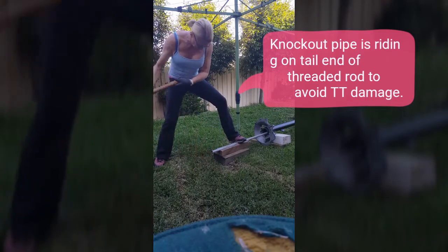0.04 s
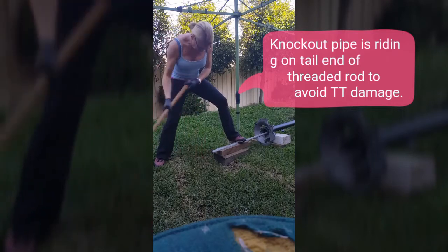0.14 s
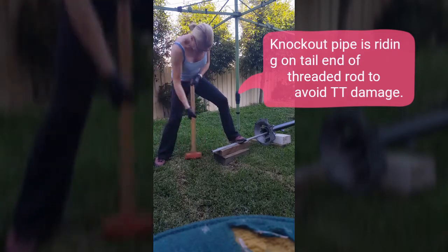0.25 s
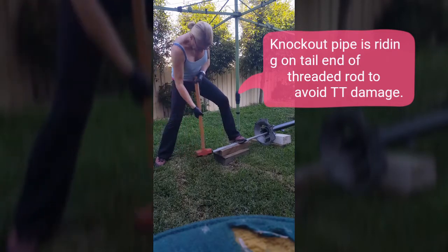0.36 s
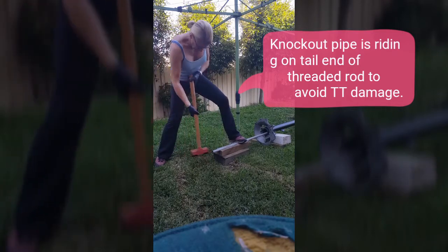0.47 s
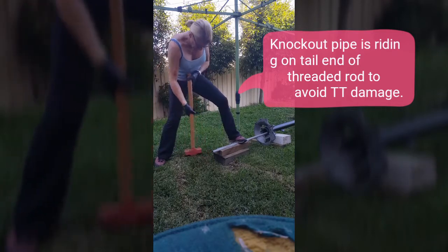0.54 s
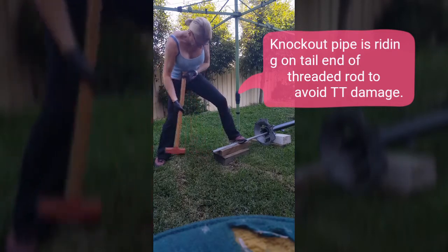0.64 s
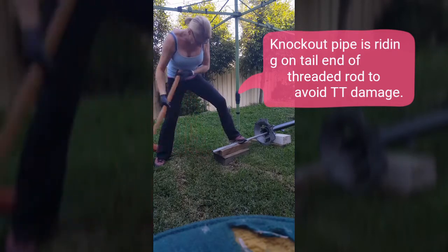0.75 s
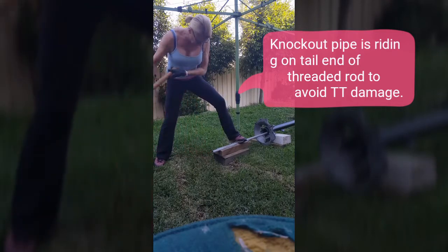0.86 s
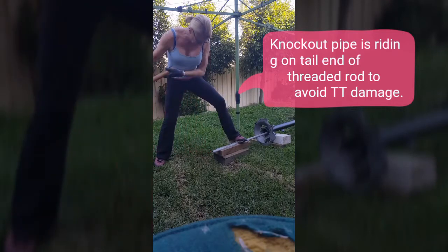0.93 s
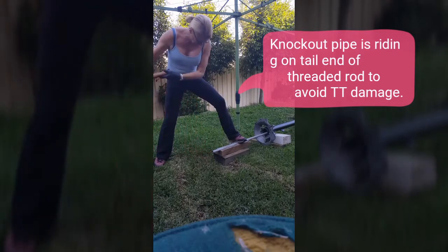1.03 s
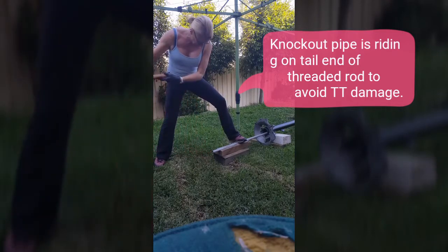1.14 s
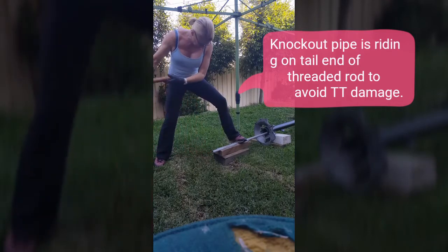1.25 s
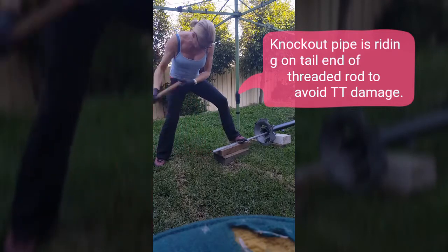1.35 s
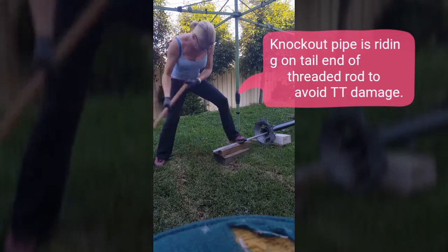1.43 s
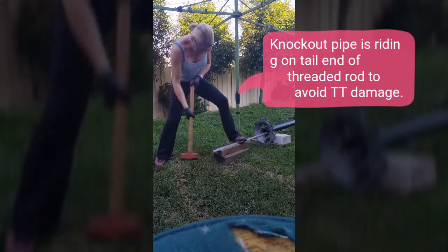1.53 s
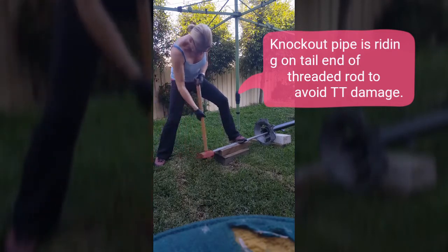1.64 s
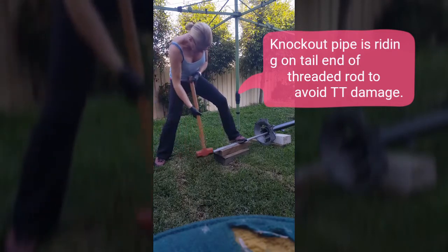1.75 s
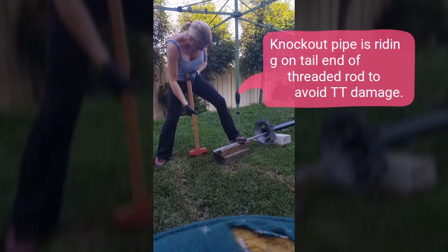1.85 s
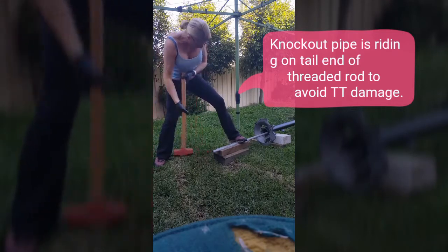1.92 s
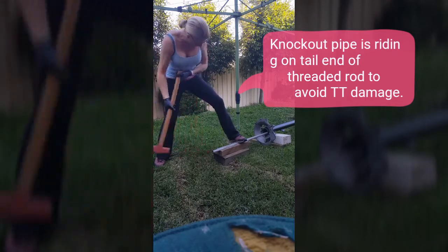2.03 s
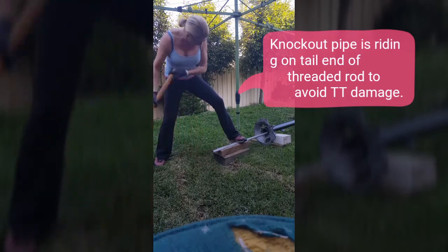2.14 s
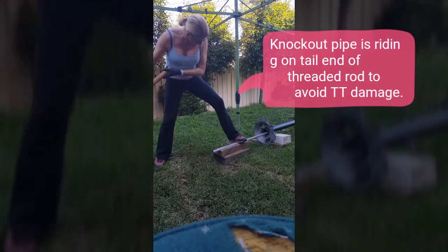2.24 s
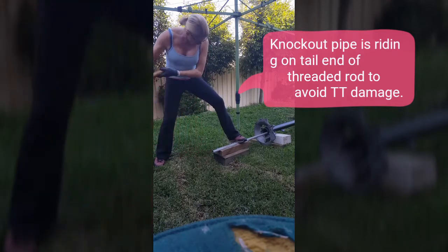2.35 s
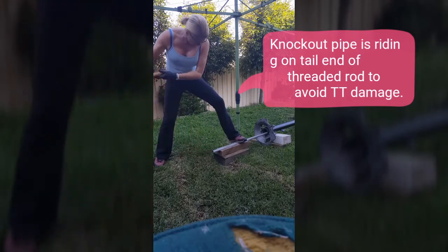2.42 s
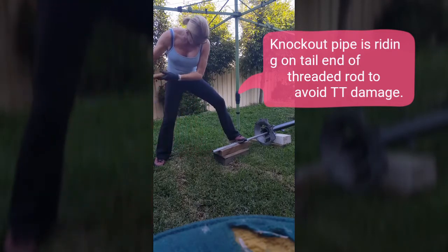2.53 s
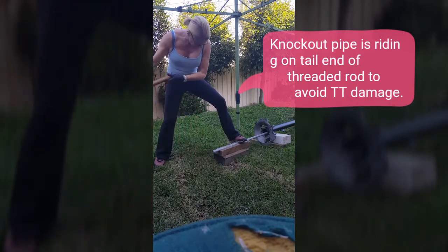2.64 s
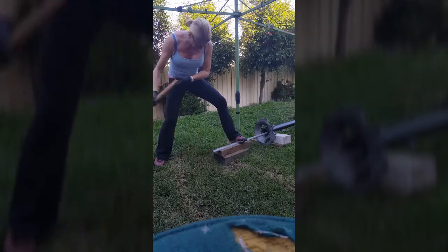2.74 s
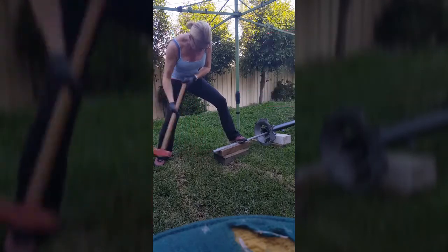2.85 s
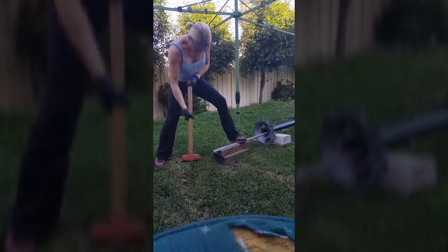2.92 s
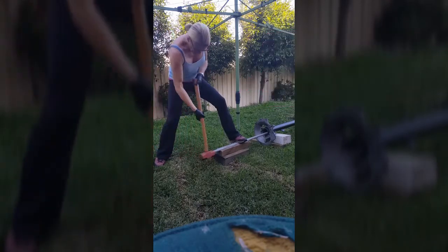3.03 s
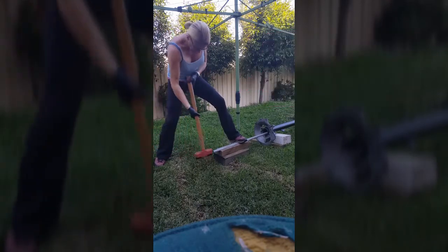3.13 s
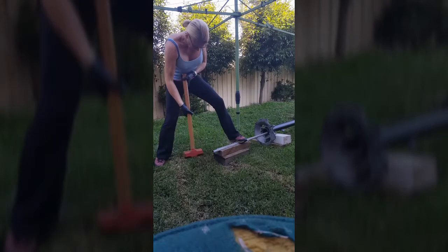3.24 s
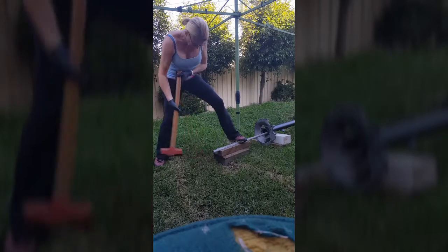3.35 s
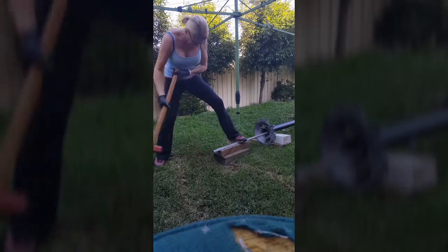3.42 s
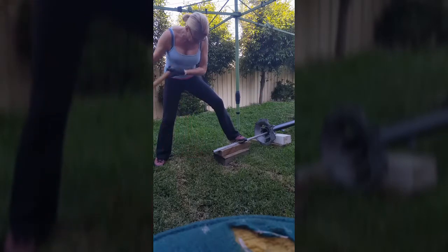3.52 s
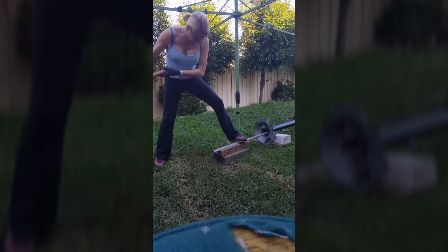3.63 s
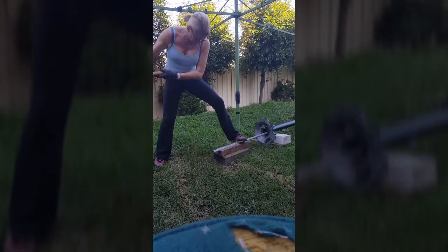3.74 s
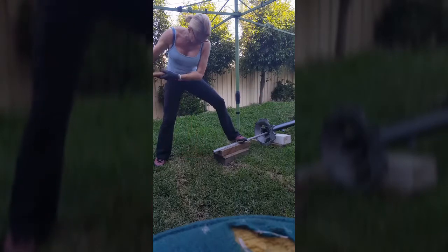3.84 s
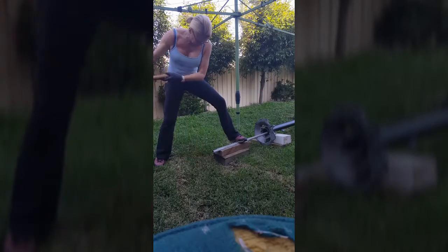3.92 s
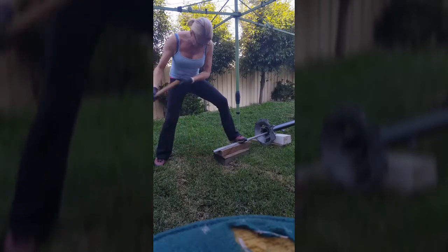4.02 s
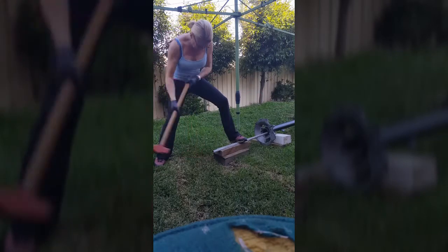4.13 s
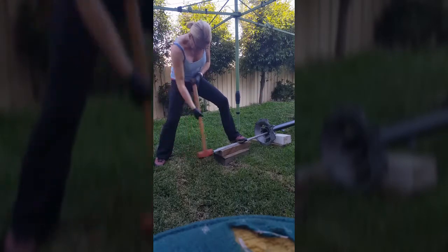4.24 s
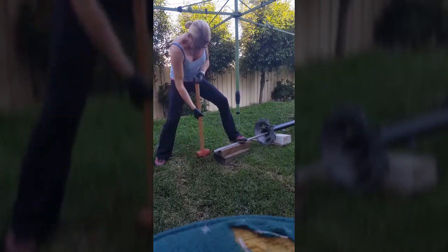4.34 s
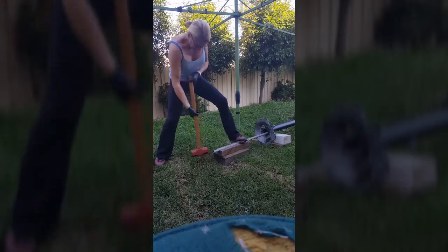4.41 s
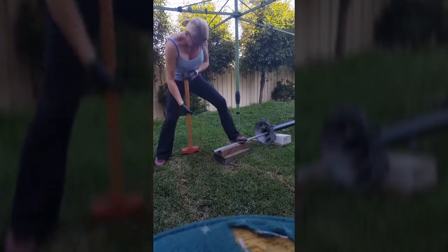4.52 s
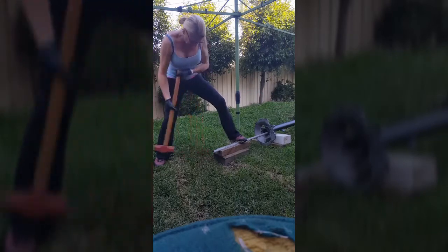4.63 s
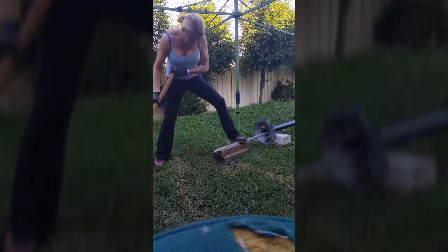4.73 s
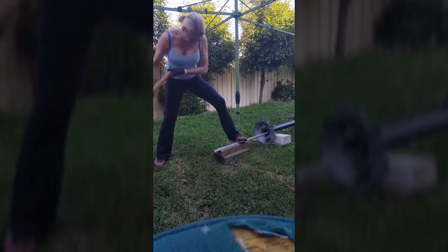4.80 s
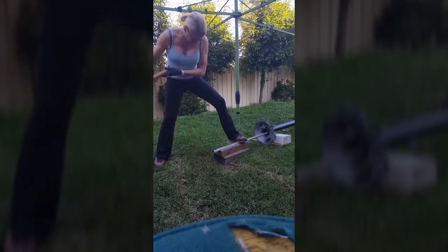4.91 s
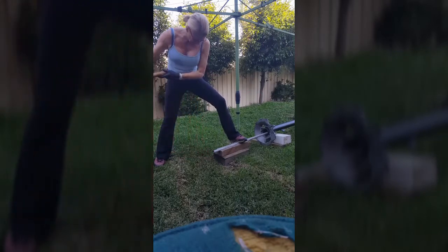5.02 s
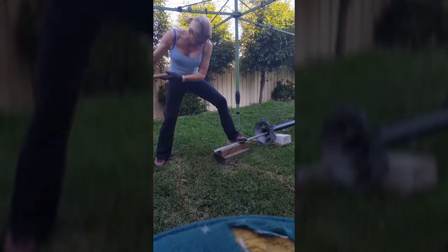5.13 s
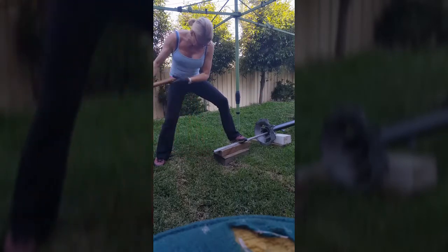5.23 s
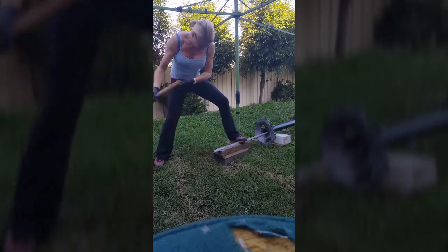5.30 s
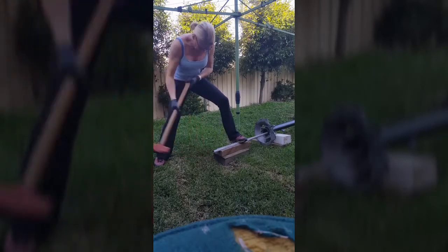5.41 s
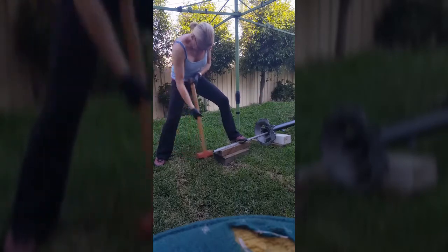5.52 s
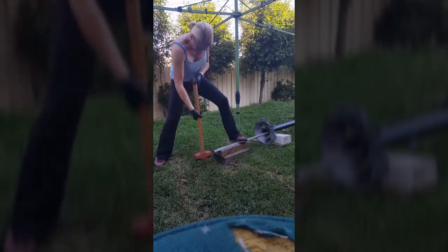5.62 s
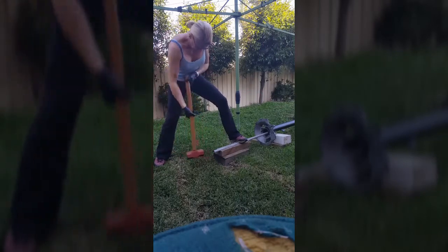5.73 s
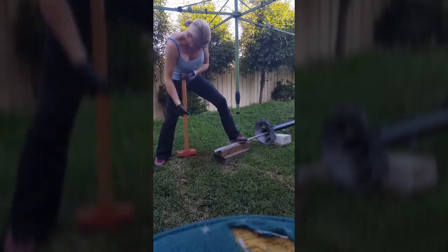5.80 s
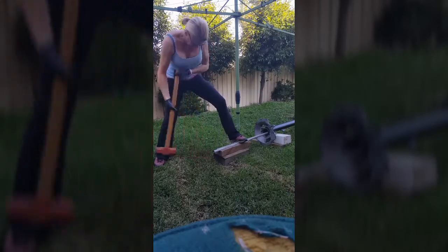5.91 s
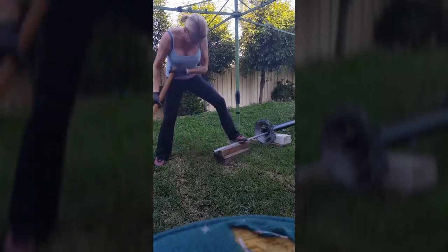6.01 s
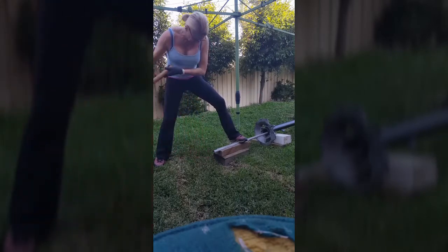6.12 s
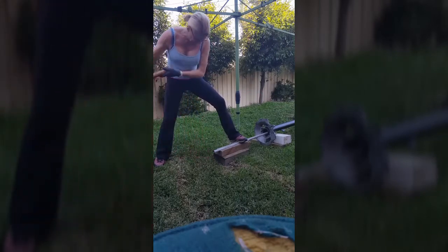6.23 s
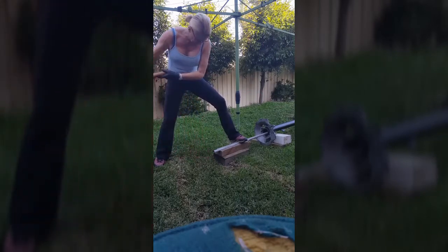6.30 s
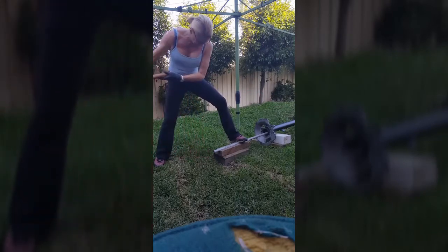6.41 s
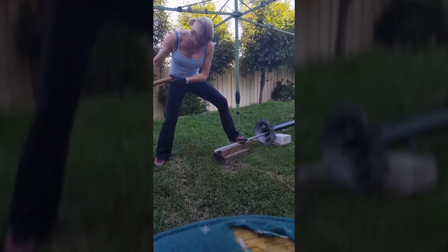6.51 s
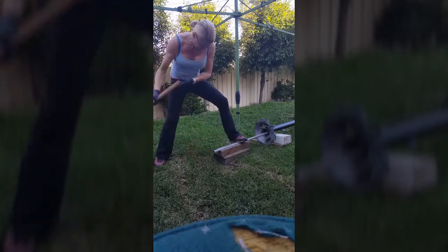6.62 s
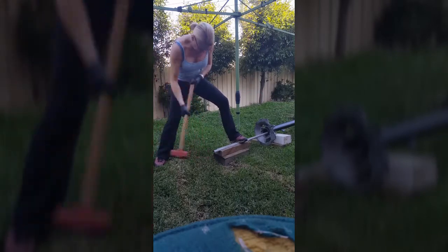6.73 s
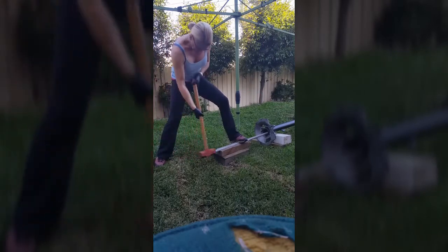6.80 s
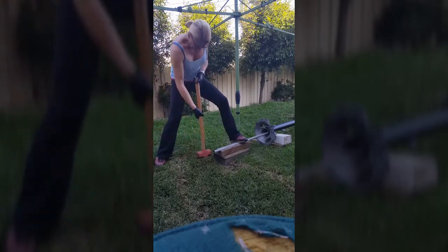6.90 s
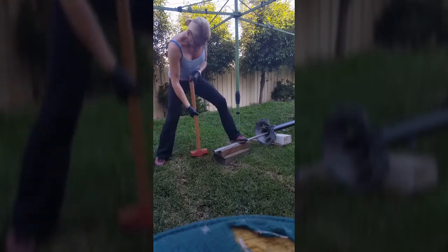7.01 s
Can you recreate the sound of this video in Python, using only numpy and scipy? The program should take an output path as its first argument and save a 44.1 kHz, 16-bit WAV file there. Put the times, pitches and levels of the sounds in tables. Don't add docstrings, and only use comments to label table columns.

```python
import sys
import numpy as np
from scipy import signal
from scipy.fft import rfft, irfft
from scipy.io import wavfile
from scipy.ndimage import uniform_filter1d

SR = 44100
rng = np.random.default_rng(int(sys.argv[2]) if len(sys.argv) > 2 else 0)


def decibels_to_gain(level_db):
    exponent = np.asarray(level_db, float) / 20
    return 10 ** exponent


def dump(signal):
    limited = np.clip(np.atleast_2d(signal).T, -1, 1)
    pcm = np.round(limited * 32767).astype(np.int16)
    wavfile.write(sys.argv[1], SR, pcm)


N = 311336

# t/s, strength/dB, thud re clang/dB, brightness re clang/dB, bang f/Hz
BLOWS = [
    (0.465, -0.5, -3.5, -6.5, 2710),
    (1.778, -1.5, 1.5, -7, 1597),
    (3.149, 0, -2, -4.5, 2345),
    (4.438, 0, -2.5, -5.5, 1592),
    (5.713, 0.5, -1.5, -6.5, 1580),
    (6.999, -1, 0.5, -3.5, 2696),
]
# f/Hz, density/dB
CLANG = [(24, -48), (40, -15.5), (164, -3), (294, -1.5), (393, -8.5), (527, -7), (816, -10.5), (900, -7.5),
         (2060, -9.5), (2380, -7), (5060, -19), (8640, -22.5), (10200, -30.5), (11800, -24.5), (13400, -42)]
# f/Hz, t60/s
YARD = [(60, 0.58), (200, 0.29), (700, 0.31), (2500, 0.31), (6000, .25), (9000, 0.33), (12000, 0.25)]
# f/Hz, level/dB
LEAN = [(60, 4), (130, -1.5), (280, -0.8), (600, 1.5), (1290, 4.5), (2790, 9.5), (5500, 7.5), (8000, 19),
        (12900, 20)]


def evened(x):
    return x / np.sqrt(np.mean(x ** 2) + 1e-20)


def db_of(ratio):
    return 10 * np.log10(ratio)


def read(points, hz):
    f, value = np.transpose(points)
    return np.interp(np.log(hz + 1), np.log(f + 1), value)


def coloured(x, db_of_hz):
    size = x.shape[-1]
    return irfft(rfft(x) * decibels_to_gain(db_of_hz(np.fft.rfftfreq(size, 1 / SR))), size)


def ports(hz, lean):
    return np.array([read(lean, hz) / 2, -read(lean, hz) / 2])


def pair(size):
    # f/Hz, correlation/1
    likeness = [(60, .55), (120, .88), (300, .95), (600, .65), (1500, .35), (4400, 0), (12900, 0)]
    a, b = rfft(rng.standard_normal((2, size)))
    same = np.clip(read(likeness, np.fft.rfftfreq(size, 1 / SR)), 0, 1)
    return irfft([a, same * a + np.sqrt(1 - same ** 2) * b], size)


def swell(s, rise_s, fall_s, db):
    t = np.arange(N) / SR - s
    return decibels_to_gain(db) * np.where(t < 0, np.exp(-(t / rise_s) ** 2), np.exp(-np.maximum(t, 0) / fall_s))


def hush(t):
    after_s, sink_s, return_s, depth_db = 0.63, 0.36, 0.32, -5
    since = t[:, None] - np.transpose(BLOWS)[0] - after_s
    return depth_db * np.exp(-(since / np.where(since < 0, sink_s, return_s)) ** 4).sum(1)


def town():
    # f/Hz, density/dB
    rumble = [(15, -42), (25, -16.5), (75, -2.5), (500, -20.5), (1500, -28.5), (6940, -44), (9500, -43),
              (13400, -50.5)]
    # f/Hz, level/dB
    rumble_lean = [(60, 1.5), (230, 0), (880, 4), (3370, 5.5), (12900, 7)]
    level_db, treble_hush = -61, 0.48
    hz, t, z = signal.stft(pair(N), SR, nperseg=1024)
    patches = uniform_filter1d(rng.standard_normal(z.shape[1:]), 5, 0)
    drift_db = 1.5 * evened(uniform_filter1d(patches, 12, 1))
    shape_db = read(rumble, hz) + ports(hz, rumble_lean)
    bass = 1 / (1 + (hz[:, None] / 550) ** 2)
    hush_db = (bass + treble_hush * (2 - bass)) * hush(t)
    z = z * decibels_to_gain(shape_db[:, :, None] + drift_db + hush_db)
    return decibels_to_gain(level_db) * evened(signal.istft(z, SR, nperseg=1024)[1][:, :N])


def grass():
    # f/Hz, density/dB
    rustle = [(180, -35), (300, -6), (1150, -7), (1320, -2.5), (2640, -7.5), (2910, -8.5), (8360, -22),
              (13000, -44.5)]
    # t/s, rise/s, fall/s, level/dB
    brushes = [
        (.1, 0.071, 0.13, -50.5),
        (0.368, 0.026, 0.029, -76),
        (1.235, 0.025, 0.062, -61.5),
        (1.386, 0.021, 0.042, -63),
        (1.69, 0.03, 0.028, -70),
        (5.45, 0.043, .06, -73),
        (6.31, 0.075, 0.12, -61),
        (6.55, .12, 0.38, -68.5),
        (6.87, 0.024, 0.056, -68.5),
    ]
    unevenness_db = 1.6 * evened(uniform_filter1d(rng.standard_normal((2, N)), 500))
    crackle = pair(N) * decibels_to_gain(2 * unevenness_db / 2)
    crackle = evened(coloured(crackle, lambda hz: read(rustle, hz) + ports(hz, LEAN)))
    return crackle * sum(swell(*row) for row in brushes)


def moans():
    # t/s, length/s, level/dB, f/Hz
    puffs = [(.07, .04, -61, 475), (0.104, 0.056, -63, 860), (0.963, .07, -74.5, 1360),
             (3.04, 0.069, -64, 698), (2.972, 0.25, -66, 408), (4.16, 0.15, -69, 690),
             (4.373, .06, -69, 590), (4.365, 0.05, -55.5, 786), (5.46, .07, -70, 698),
             (6.369, 0.048, -61.5, 900), (6.366, 0.076, -66, 1270), (6.77, .06, -65, 757),
             (6.843, 0.052, -60.5, 622)]
    rise_share, width_share = 0.71, 0.12
    t, out = np.arange(N) / SR, np.zeros(N)
    re, im = rng.standard_normal((2, N))
    for s, length_s, db, hz in puffs:
        r = np.exp(-np.pi * width_share * hz / SR)
        noise = np.roll(re + 1j * im, round(50 * hz))
        waver = signal.lfilter([1], [1, -2 * r, r * r], noise)
        tone = evened((waver * np.exp(2j * np.pi * hz * t)).real)
        out += swell(s, rise_share * length_s, length_s, db) * tone
    return out


def pushed(chatter):
    push_hz, push_s = 2200, 0.005
    hz = np.fft.rfftfreq(len(chatter), 1 / SR)
    low = 1 / (1 + (hz / push_hz) ** 2)
    push = np.sqrt(low) * np.exp(-2j * np.pi * hz * push_s)
    return irfft(np.sqrt(1 - low) * rfft(chatter) + push, len(chatter))


def yard(size):
    # f/Hz, build-up/s
    build = [(100, 0.016), (300, .018), (700, .005), (2000, 0.0019)]
    hz, t, z = signal.stft(pair(size), SR, nperseg=256)
    lumps = evened(uniform_filter1d(rng.standard_normal((2, len(hz))), 2))[:, :, None]
    t60_s = read(YARD, hz)[:, None] * decibels_to_gain(0.25 * lumps[0])
    far = decibels_to_gain(-32.5 - 60 * t / 0.65) * np.exp(-np.log((hz[:, None] + 1) / 2600) ** 2)
    gather = 1 - np.exp(-(t + 0.0048) / read(build, hz)[:, None])
    z = z * gather * decibels_to_gain(1.05 * lumps[1]) * (decibels_to_gain(-60 * t / t60_s) + far)
    tail = signal.istft(z, SR, nperseg=256)[1][:, :size]
    tail = tail * (1 - np.exp(-np.arange(size) / SR / 0.0026))
    return tail / np.linalg.norm(tail[0])


def ringing(modes, t, spread_db, rough):
    hz, db, t60_s = np.transpose(modes)[:, :, None]
    apart = np.minimum(hz / 2500, 1)
    luck = rng.standard_normal((len(modes), 3))
    phase = 9 * luck[:, 1:2] + [[[0]], [[1]]] * luck[:, 2:] * 2 * apart
    knots_s = np.arange(0, t[-1] + 0.1, 0.016)
    re, im = rng.standard_normal((2, 2 * len(modes), len(knots_s)))
    drifts = np.array([np.interp(t, knots_s, j) for j in re + 1j * im])
    left, own = drifts.reshape(2, len(modes), -1)
    wobble = 1 + rough * np.array([left, np.sqrt(1 - apart ** 2) * left + apart * own])
    sines = (wobble * np.exp(1j * phase) * np.exp(2j * np.pi * hz * t)).imag
    return (decibels_to_gain(db + spread_db * luck[:, :1] - 60 * t / t60_s) * sines).sum(1)


def small_parts(count):
    hz = np.geomspace(1000, 12800, count) * rng.uniform(1.0, 1.02, count)
    level_db = read(CLANG, hz) + 0.5 * db_of(hz / 2000)
    t60_s = read(YARD, hz) * rng.uniform(0.5, 1.1, count)
    return np.transpose([hz, level_db, t60_s])


def patchy(x, depth_db):
    hz, t, z = signal.stft(x, SR, nperseg=512)
    f = hz[:, None]
    luck = rng.standard_normal((2, len(hz) // 4 + 1, len(t) // 6 + 1))
    luck = luck.repeat(4, axis=1).repeat(6, axis=2)
    odds = np.interp(hz, [1500, 4000, 13000], [-2.4, -1.3, -0.7])[:, None] + 2 * t * (f / 9000) ** 2
    holes = luck[:, :len(hz), :len(t)] < odds
    late = np.maximum.accumulate(holes * (t > 0.09), axis=2)
    holes = np.maximum(holes, late * (f > 9300))
    deaf = ((f > 9950) & (f < 10800) | (f > 13150)) * (t > 0.025)
    gain_db = depth_db * holes * (t > 0.01) - 40 * deaf
    return signal.istft(z * decibels_to_gain(gain_db), SR, nperseg=512)[1][:, :x.shape[1]]


def clang(parts, db, thud_db, bright_db, bang_hz):
    # f/Hz, level/dB, t60/s
    pipe_modes = [(300, -8, .28), (470, -12, .22), (530, -10, .22), (635, -13, .22), (904, -6.5, .33),
                  (1211, -12, .22), (1545, -13, .25), (1900, -12, .2), (2376, -4, .27), (2431, -8, .2),
                  (2797, -11, .22), (2975, -14, .22), (3245, -12, .2), (3566, -16, .2), (3806, -13, .2),
                  (4280, -13, .3)]
    # f/Hz, level/dB, t60/s
    ground_modes = [(66, -10, .3), (110, -4, .33), (163, -1, .2), (283, -5, .2)]
    rattle_s, loose = 0.0053, 0.7
    t = np.arange(int(0.6 * SR)) / SR
    chatter = rng.standard_normal(len(t)) * (1 - np.exp(-(t / 0.0036) ** 3)) * np.exp(-t / rattle_s)
    chatter = pushed(chatter / np.linalg.norm(chatter))
    direct = decibels_to_gain(-9) * coloured(chatter, lambda hz: read([(200, -12.5), (800, 0)], hz))
    spread = signal.fftconvolve(chatter[None], yard(len(t)), axes=1)[:, :len(t)] + direct
    tilt = [(150, thud_db), (900, -2.0), (3000, 1.0), (4100, 0.5), (5500, 0.0), (8000, bright_db)]
    padded = np.pad(spread, ((0, 0), (400, 0)))
    crash = coloured(padded, lambda hz: read(CLANG, hz) + read(tilt, hz))[:, 400:]
    crash = crash / np.linalg.norm(crash) * decibels_to_gain(24.5)
    start = 1 - np.exp(-(t / 0.0046) ** 2)
    wall = [(bang_hz * k, 0, 0.09) for k in (0.93, 1, 1.09)] + [(1650, -0.51, 0.12)]
    bang = decibels_to_gain(-12.5) * ringing(wall, t, 0.82, 0.3) * start
    pipe = decibels_to_gain(-13) * ringing(pipe_modes, t, 1.5, loose) * start
    rattle = decibels_to_gain(-21.0 + bright_db) * ringing(parts, t, 3.2, 2 * loose) * start
    ground = decibels_to_gain(-17 + thud_db) * ringing(ground_modes, t, 0.83, 0.4)
    ground = ground * (1 - np.exp(-t / 0.036))
    return decibels_to_gain(db) * patchy(crash + bang + pipe + rattle + ground, -25)


def head(low_db, middle_db, high_db, low_stretch, upper_stretch):
    # f/Hz, level/dB, t60/s, family/index
    head_modes = [(1620, 0, 2.2, 0), (6799, 0, 1.4, 1), (6823, -4, .75, 1), (7862, 1, .5, 1),
                  (10955, 0, .7, 2), (10930, -6, .5, 2), (9440, -6, .4, 2), (8168, -6, .4, 2)]
    family_stretch = [0.72, 0.73, 1.05]
    t = np.arange(int(2.5 * SR)) / SR
    levels_db = (low_db, middle_db, high_db)
    stretch = (low_stretch, upper_stretch, upper_stretch)
    modes = [(hz, db + levels_db[k], t60_s * family_stretch[k] * stretch[k])
             for hz, db, t60_s, k in head_modes]
    return ringing(modes, t, 0, 0.18) * (1 - np.exp(-t / 0.004)) * decibels_to_gain([[0], [-5]])


def add(mix, s, sound):
    part = mix[:, round(s * SR):][:, :sound.shape[1]]
    part += sound[:, :part.shape[1]]


def hammering():
    # low/dB, middle/dB, high/dB, low stretch/1, upper stretch/1
    rings = [
        (-50, -52, -53.5, 1.1, 1.3),
        (-38, -55.5, -72, 1.15, 1.7),
        (-39.5, -65, -55.5, 1.2, .9),
        (-41, -44.5, -49, 1.01, 1.01),
        (-44, -63.5, -61.5, 1.01, 1.3),
        (-44, -63, -50, 1.2, .95),
    ]
    # f/Hz, width/Hz, level/dB
    hollows = [(4530, 110, -13.5), (7270, 340, -3.5), (10360, 510, -10), (13200, 300, -15)]
    out, parts = np.zeros((2, N + SR)), small_parts(count=40)
    for (s, *blow), ring in zip(BLOWS, rings):
        add(out, s - 0.0035, clang(parts, *blow))
        add(out, s, head(*ring))

    def housing_db(hz):
        dips_db = sum(db * np.exp(-((hz - f) / width_hz) ** 4) for f, width_hz, db in hollows)
        return ports(hz, LEAN) + dips_db

    return coloured(out, housing_db)[:, :N]


def scene():
    left, right = town() + grass() + moans() + hammering()
    return np.array([left, np.roll(right, 4)])


def roll_off(x):
    return signal.sosfilt(signal.butter(12, 13530, fs=SR, output="sos"), x)


def record(dry):
    release_db_per_s, threshold_db, ratio, smooth_s = 23.0, -28.5, 0.43, 0.22
    power_db = db_of(abs(signal.lfilter(np.ones(400) / 400, 1, (dry ** 2).mean(0))) + 1e-12)
    fall_db = np.arange(N) * release_db_per_s / SR
    held_db = np.maximum.accumulate(power_db + fall_db) - fall_db
    over_db = np.maximum(held_db - threshold_db, 0)
    r = np.exp(-1 / (smooth_s * SR))
    ducked = dry / decibels_to_gain(ratio * signal.lfilter([1 - r], [1, -r], over_db))
    edge = signal.firwin(255, 13300, fs=SR)
    limited = signal.oaconvolve(np.clip(ducked, -1.1, 1.1), edge[None], "same")
    opening = np.minimum(np.arange(N) / SR / 0.0067, 1)
    return roll_off(np.clip(limited, -1, 1) * opening)


dry = scene()
out = record(dry)
dump(out)
```